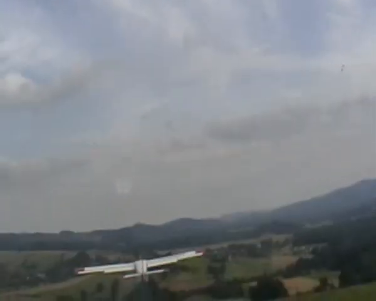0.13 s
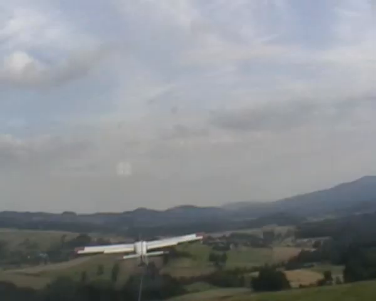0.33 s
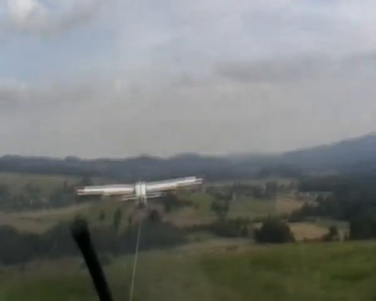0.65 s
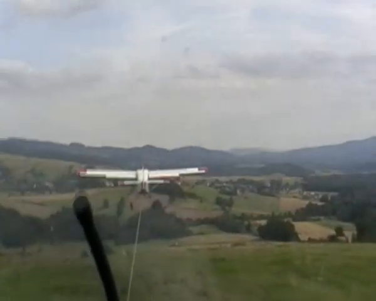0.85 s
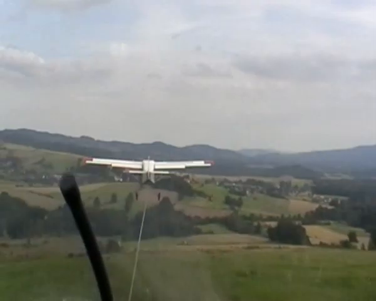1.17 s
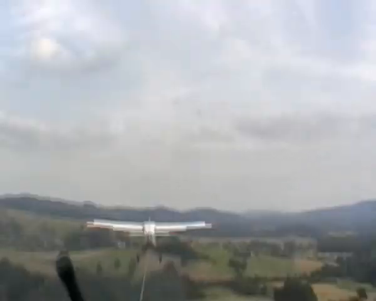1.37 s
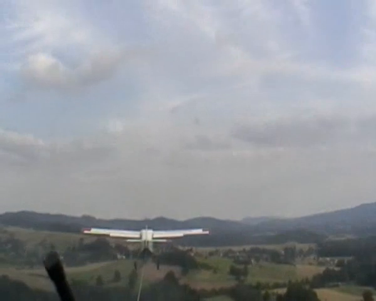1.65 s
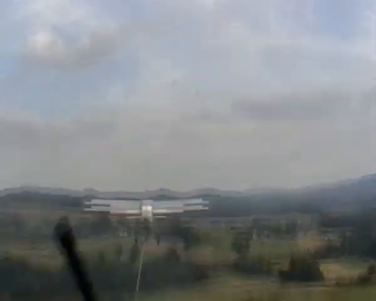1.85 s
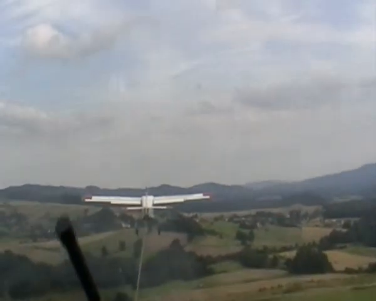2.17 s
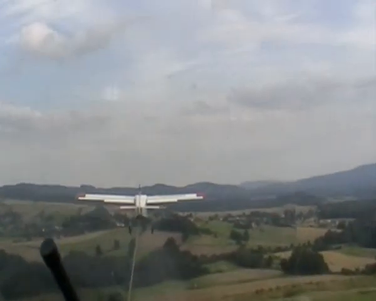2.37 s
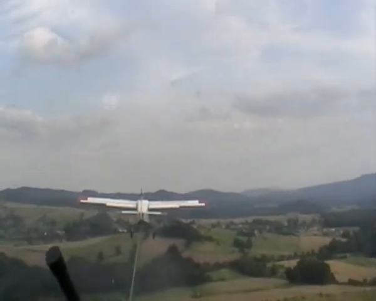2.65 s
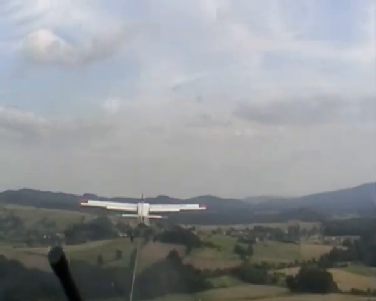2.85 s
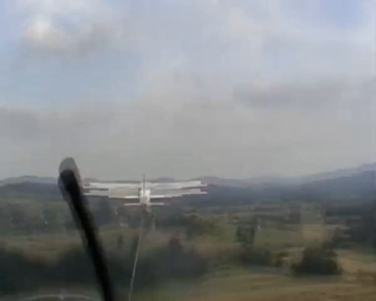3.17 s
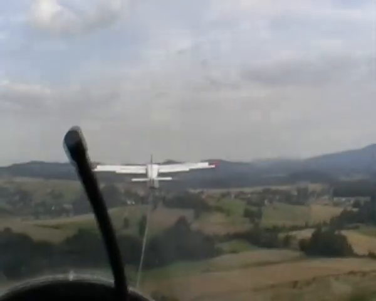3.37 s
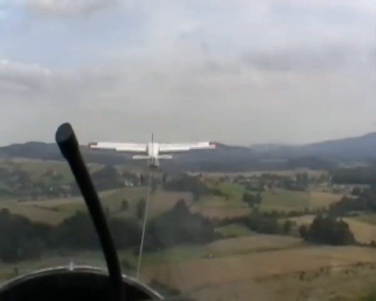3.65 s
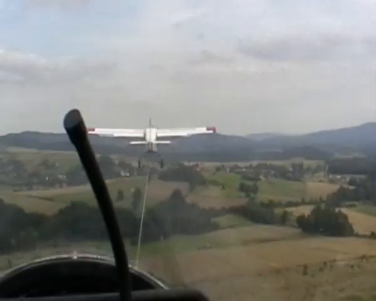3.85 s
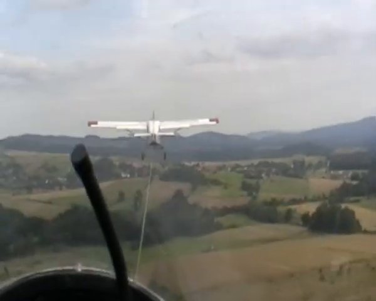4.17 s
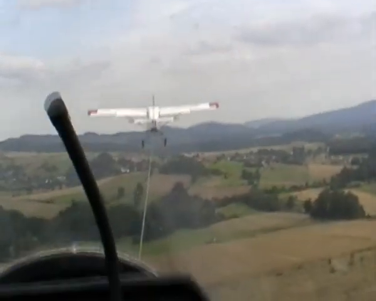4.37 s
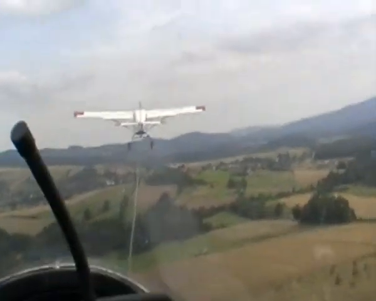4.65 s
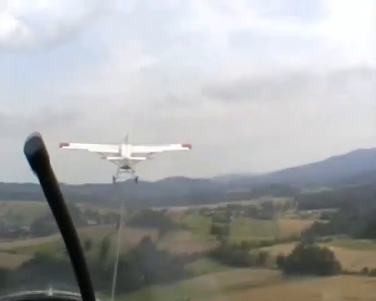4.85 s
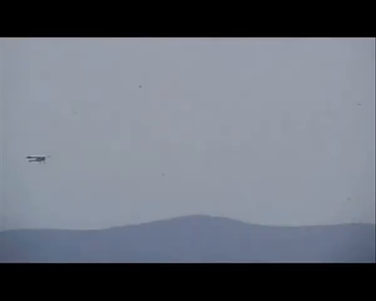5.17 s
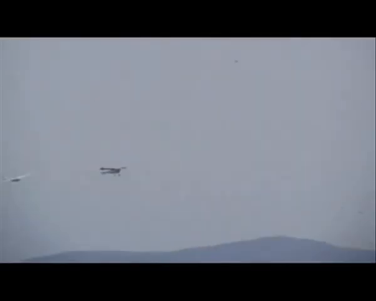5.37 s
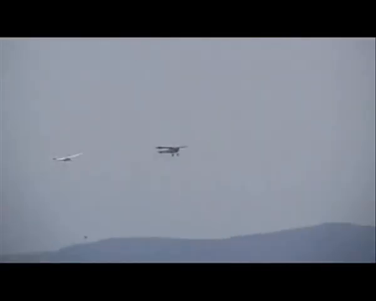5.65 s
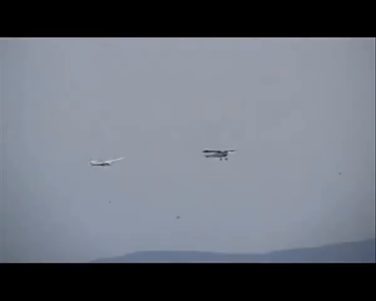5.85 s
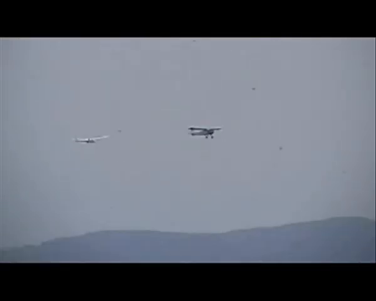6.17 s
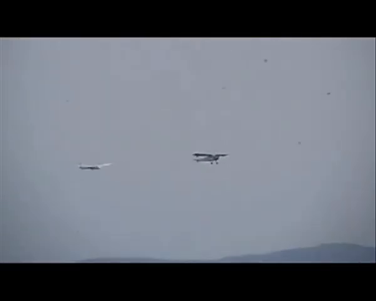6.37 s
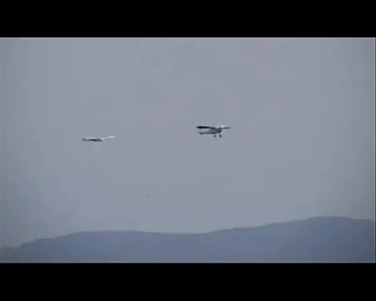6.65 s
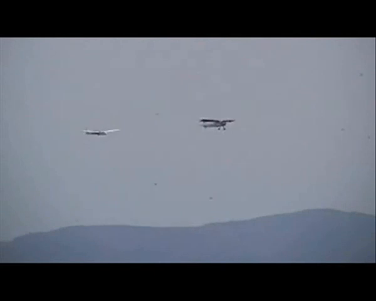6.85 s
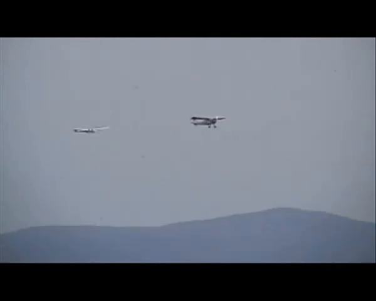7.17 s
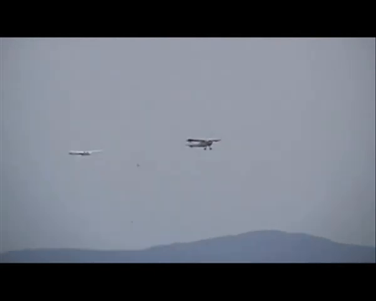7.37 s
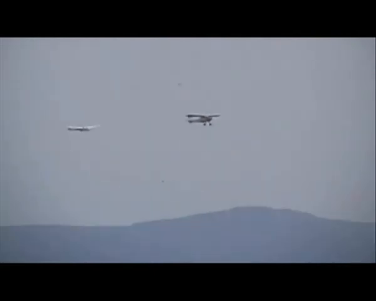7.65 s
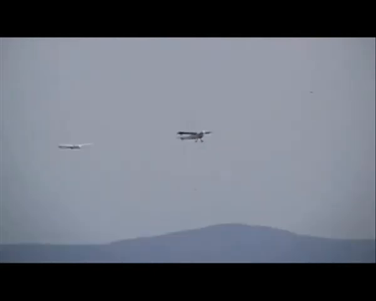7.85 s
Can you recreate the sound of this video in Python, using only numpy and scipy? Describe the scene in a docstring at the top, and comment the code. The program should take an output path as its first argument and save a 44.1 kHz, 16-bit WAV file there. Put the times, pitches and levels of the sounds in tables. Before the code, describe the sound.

Loud booming, rushing wind fills a glider cockpit, cuts off abruptly, then a distant propeller plane drones over a quiet meadow with buzzing crickets.

```python
"""Glider tow, cabin then meadow

In the cabin, turbulent air booms in the resonances and rushes and hisses through vents and seals.
The sound is cut; a thin hiss dies away, and after a short silence a meadow is heard. A far radial
engine is summed from orders of its firing cycle and noise with a ground echo. A bush cricket close by
and a fainter ticking one are gated noise, the bird pips gliding sines, over a soft field hiss.
A short soft click, a sine under a bell, comes at the very end."""
import sys
import numpy as np
from scipy import signal
from scipy.fft import rfft, irfft, next_fast_len
from scipy.io import wavfile

SR = 44100
rng = np.random.default_rng(int(sys.argv[2]) if len(sys.argv) > 2 else 0)


def to_wav(s):
    """Save 16-bit WAV."""
    ch = np.atleast_2d(s).T  # columns
    pcm = np.round(np.clip(ch, -1, 1) * 32767)  # PCM
    wavfile.write(sys.argv[1], SR, pcm.astype(np.int16))


N = 353663   # samples in both scenes together

CUT_S, MEADOW_S = 5.1045, 5.238   # cabin sound ends, meadow begins

# All levels are relative, ahead of the trims in the functions and the recorder.
# Air over the canopy. Each row: time in seconds, boom level in dB, rush level in dB.
AIRFLOW = [(0.0, -14.5, -25), (0.4, -13, -22), (0.5, -12.5, -24.5), (0.85, -13.5, -25), (1.3, -14.5, -24.5),
           (1.45, -14.5, -25), (2.0, -14, -25.5), (2.15, -15, -26.5), (2.55, -14, -26), (3.1, -14, -25),
           (3.27, -13.5, -24), (3.33, -14, -26), (3.7, -15, -26.5), (3.9, -16, -24), (4.2, -14, -23),
           (4.58, -13, -22.5), (4.65, -14.5, -21.5), (5.1, -13, -23)]
# Puffs through vent and seals. Each row: centre in seconds, lift in dB, length in seconds.
PUFFS = [(0.57, 4.5, 0.015), (0.912, -0.5, 0.021), (1.227, -1, 0.014), (1.61, 4.5, 0.023),
         (1.732, 4, 0.022), (2.105, 7.5, 0.011), (2.328, 4.5, 0.036), (2.625, 2.5, 0.043), (4.117, 3, .03),
         (5.024, 4.5, 0.021)]
RUSH_PUFFS, BOOM_PUFFS = 0.48, 0.55   # shares of a puff's lift; the hiss takes it all
HISS_DB, HISS_FOLLOWS = -41, 1.55   # leak hiss at the mean rush in dB; share of the rush's swing
# Boom colour in the cabin. Each row: frequency in Hz, spectrum in dB per Hz.
BOOM_SPECTRUM = [(12, -59), (25, -40), (40, -36), (52, -19.5), (90, -14.5), (130, -8), (200, -4.5),
                 (270, -3.5), (305, -8.5), (345, -17.5), (460, -15), (620, -16.5), (820, -23.5), (950, -29),
                 (1240, -56), (2000, -100)]
# Vent rush colour. Each row: frequency in Hz, spectrum in dB per Hz.
RUSH_SPECTRUM = [(500, -13.5), (850, -4), (873, -18), (935, -1), (1480, -2), (1660, -5), (2710, -1.5),
                 (3230, -5.5), (3960, -21), (4300, -19), (5590, -29.5), (9460, -120)]
# Seal leak colour. Each row: frequency in Hz, spectrum in dB per Hz.
HISS_SPECTRUM = [(2290, -33), (3900, -8), (4400, -4.5), (7320, 3), (8450, -3), (13000, -6.5), (15500, -8)]
# Cabin resonances. Each row: frequency in Hz, width in Hz, lift in dB.
CABIN_MODES = [(136.8, 20, 5.5), (176, 20, -1.5), (255.5, 16, 1.5), (290.3, 26.7, 7), (520.2, 47.3, 10.5),
               (573, 18, 4.5), (739, 59, 3.5), (800, 22, 3.5), (932, 34, 2.5), (2720, 460, 3.5)]
# Cabin microphone ports. Each row: frequency in Hz, left-right likeness from 0 to 1.
CABIN_LIKENESS = [(30, 0.64), (120, 0.96), (300, 1), (700, 0.94), (1300, 0.84), (2500, 1), (4300, 0.69),
                  (6000, 0.22), (7900, 0.19), (9000, 0.73), (15000, .7)]
# Cabin port levels. Each row: frequency in Hz, left minus right in dB.
CABIN_BALANCE = [(60, 1.5), (110, -2), (200, 0.0), (380, 1), (700, 2.0), (1290, 1), (2380, -0.5),
                 (4400, -0.5), (8120, 2.5), (15000, -0.5)]
# Cabin port phase. Each row: frequency in Hz, lead of the left in radians.
CABIN_PHASE = [(0, 0), (260, 0.4), (1890, -0.0), (3450, 0.3), (4050, 2.2), (4570, 2.5), (5250, 6.4),
               (6630, 6.4), (6980, 6.7), (7840, 9.0), (8270, 12.2), (8530, 12.5), (10300, 12.7),
               (15300, 12.6)]
# Thin hiss that outlasts the cut. Each row: frequency in Hz, spectrum in dB per Hz.
AFTER_HISS_SPECTRUM = [(35, -40), (100, -8), (1000, -13), (2800, -6), (4000, -18), (8000, -25),
                       (15600, -28)]
AFTER_HISS_DB, AFTER_HISS_T60_S = -42.5, 0.13   # level at the cut; time to fall 60 dB

# Far engine's pace. Each row: time in seconds, firing cycles per second.
FIRING_CYCLE = [(5.24, 17.8), (6.4, 17.85), (7.0, 17.88), (8.02, 18)]
# Far engine, carried unevenly by the air. Each row: time in seconds, then drone, growl and rasp in dB.
ENGINE_LEVELS = [(5.24, -43.5, -45, -57.5), (5.6, -42.2, -48, -58.5), (6.0, -42, -49, -58),
                 (6.45, -41, -51, -59), (6.85, -40.5, -49, -58), (7.15, -41.5, -47, -55.5),
                 (7.4, -42, -47, -55.5), (7.7, -39.5, -41.3, -49.5), (7.8, -39.3, -40.5, -48.5),
                 (8.02, -38.2, -43, -51.5)]
# Orders of the cylinders' firing. Each row: multiple of the cycle, level in dB.
FIRING_ORDERS = [(1, -44), (2, -40), (3, -22), (4, -29), (5, -29), (6, -14), (7, 0), (8, -22), (9, -5),
                 (10, -23), (11, -16), (12, -24), (13, -11), (14, -24), (15, -19), (16, -15), (17, -20),
                 (18, -24), (19, -18), (20, -19), (21, -22), (22, -25), (23, -15), (24, -21), (25, -24),
                 (26, -21), (27, -23), (28, -24), (29, -25), (30, -23), (31, -24), (32, -21), (33, -24),
                 (34, -25), (35, -22), (36, -25), (37, -28), (38, -27)]
# Exhaust noise. Each row: frequency in Hz, spectrum in dB per Hz.
GROWL_SPECTRUM = [(15, -60), (35, -24), (55, -10), (90, -1), (140, 10.5), (300, -10), (450, -18), (620, 2),
                  (780, -1), (950, -11), (1300, -60)]
# Propeller noise. Each row: frequency in Hz, spectrum in dB per Hz.
RASP_SPECTRUM = [(500, -46), (850, -6.5), (1180, 4.5), (1350, -3), (1600, -1), (2000, -13.5), (2280, -7),
                 (2550, -13), (2800, -8.5), (3300, -40), (4400, -40), (6000, -60)]
BRIGHTENS_HZ, BRIGHTENS = 1400, .45   # the rasp above this swings further, by this share of its swing
GROUND_ECHO_S, GROUND_ECHO_DB = .0018, -16.5   # delay and level of the engine noise off the ground

# Near cricket's beat: start in s, strokes per s, slows from s, by strokes per s each s.
WING_STROKES = 5.2017, 54.2, 7.3, 2.1
# Near cricket's buzz. Each row: time in seconds, level in dB, share in strokes from 0 to 1.
BUZZ = [(5.24, -68, .1), (5.6, -66, 0.04), (6.0, -60.5, 0.45), (6.4, -59, 0.64), (7.2, -54.5, 0.88),
        (8.02, -55, 0.9)]
# Wing resonances. Each row: frequency in Hz, spectrum in dB per Hz.
WING_SPECTRUM = [(5000, -45), (6500, -34), (7300, -14), (8100, -3), (8700, -3.5), (9400, -4), (9800, -0.5),
                 (10600, -0.5), (11000, -8), (11500, -5), (12300, -9), (12700, -16), (13300, -5),
                 (13750, -10), (13950, -80)]
# Faint cricket's beat: start in s, ticks per s, slows from s, by ticks per s each s.
TICKS = 5.231, 76.66, 6.2, 17
# Faint cricket. Each row: time in seconds, level in dB.
TICKING = [(5.24, -70), (6.3, -68), (6.5, -69), (6.63, -76)]
# Colour of the ticks. Each row: frequency in Hz, spectrum in dB per Hz.
TICK_SPECTRUM = [(11500, -50), (12800, -11), (13800, -3), (14500, 2), (15150, -5), (15300, -50)]
# Short tones: bird pips, and in the last row a soft click at the very end.
# Each row: centre in seconds, pitch in Hz, rise in Hz, length in seconds, level in dB.
SHORT_TONES = [(5.803, 3000, 250, .016, -56.5), (5.822, 3250, 150, .007, -65), (5.84, 3400, 50, .012, -63),
               (5.857, 3320, -100, .016, -58), (5.874, 3380, 0, .008, -67), (6.625, 2760, 0, .022, -61.5),
               (8.016, 2800, 0, .012, -53)]
BIRD_PIPS, END_CLICK = SHORT_TONES[:-1], SHORT_TONES[-1:]

# Hiss of the field. Each row: frequency in Hz, spectrum in dB per Hz.
FIELD_HISS_SPECTRUM = [(800, -30), (1500, -6.5), (2800, -2.5), (3900, -11), (4400, -11), (4800, -11),
                       (7000, -11.5), (9000, -17), (13500, -40), (14000, -80)]
FIELD_HISS_DB = -66
# Faint steady tones. Each row: frequency in Hz, level in dB.
WHINE = [(2788, -76), (3900, -90)]
# Meadow microphone ports. Each row: frequency in Hz, left-right likeness from 0 to 1.
MEADOW_LIKENESS = [(30, .9), (120, 0.91), (300, 0.92), (700, 0.82), (1300, 0.86), (2500, 0.98), (4300, .4),
                   (6000, 0.4), (7900, 0.27), (9000, 1), (15000, 0.63)]
# Meadow port levels. Each row: frequency in Hz, left minus right in dB.
MEADOW_BALANCE = [(60, -13), (110, 1.5), (200, -0.5), (380, 2.5), (700, 0.5), (1290, 1.5), (2380, -0.5),
                  (4400, 0.5), (8120, -1), (15000, 2)]
# Meadow port phase. Each row: frequency in Hz, lead of the left in radians.
MEADOW_PHASE = [(0, 0), (3190, -0.1), (3880, 0.7), (4310, 3.2), (5080, 3.2), (6630, 4.6), (7750, 2.7),
                (8440, 0.1), (10700, -0.5), (11200, 0.1), (11500, -0.1), (13800, 0.0), (14300, 0.7),
                (15300, -0.1)]
CUTOFF_HZ = 15730   # top of the recorder


def cockpit():
    """Boom, rush and hiss share the buffeting of the tow plane's wake and ring in the cabin."""
    size = next_fast_len(int(MEADOW_S * SR))
    time = np.arange(size) / SR
    boom_db, rush_db, hiss_db = airflow(time)
    buffet = drift(18, size)
    air = from_db(boom_db) * patchy_noise(BOOM_SPECTRUM, size, 1.26 * buffet, own_db=0.25, own_rate=17)
    air += from_db(rush_db) * patchy_noise(RUSH_SPECTRUM, size, 1.13 * buffet,
                                           own_db=0.38, own_rate=28, count=4)
    air += from_db(hiss_db) * patchy_noise(HISS_SPECTRUM, size, 0.86 * buffet,
                                           own_db=0.65, own_rate=24, count=3)
    air = cabin_resonance(air)
    air = two_ports(air[0], CABIN_LIKENESS, CABIN_BALANCE, CABIN_PHASE, air[1])
    air *= np.clip((CUT_S - time) / 0.00046, 0, 1)   # a hard cut, ramped just enough
    return air + after_hiss(time)


def airflow(time):
    """Levels of boom, rush and hiss: the slow flow, with short puffs on top."""
    boom_db, rush_db = in_time(AIRFLOW, time)
    puff_db = sum(db * np.exp(-((time - s) / length) ** 2) for s, db, length in PUFFS)
    hiss_db = HISS_DB + HISS_FOLLOWS * (rush_db - rush_db.mean())
    return boom_db + BOOM_PUFFS * puff_db, rush_db + RUSH_PUFFS * puff_db, hiss_db + puff_db


def cabin_resonance(air):
    """The enclosed air lifts a bell of frequencies around each of its modes."""
    size = air.shape[1]
    hz = np.arange(size // 2 + 1) * SR / size
    lift_db = sum(db / (1 + (2 * (hz - mode_hz) / width) ** 2) for mode_hz, width, db in CABIN_MODES)
    return irfft(rfft(air) * from_db(lift_db - 3), size)


def after_hiss(time):
    """Thin hiss, alike in both channels, that decays exponentially after the cut and then stops."""
    since = time - CUT_S
    level = from_db(AFTER_HISS_DB - 60 * np.maximum(since, 0) / AFTER_HISS_T60_S)
    level *= (since > 0) * (since < .062)
    return level * patchy_noise(AFTER_HISS_SPECTRUM, len(time), 0, own_db=-3.5, own_rate=12, count=1)[0]


def far_engine(time):
    """Tonal drone, exhaust growl and propeller rasp at a distance; the noise also returns off the ground."""
    cycle_hz, = in_time(FIRING_CYCLE, time)
    drone_db, growl_db, rasp_db = in_time(ENGINE_LEVELS, time)
    turns = 2 * np.pi * (np.cumsum(cycle_hz) / SR + .45)   # phase of the cycle in radians
    drone = engine_drone(turns, drone_db, growl_db)
    noise = exhaust_growl(turns, growl_db) + propeller_rasp(turns, rasp_db)
    noise += from_db(GROUND_ECHO_DB) * np.roll(noise, int(GROUND_ECHO_S * SR), axis=1)
    return drone + noise


def engine_drone(turns, drone_db, growl_db):
    """Each order of the firing cycle is a sine whose level and phase waver in the air."""
    size = len(turns)
    drone = np.zeros((2, size))
    for order, level_db in FIRING_ORDERS:
        high = np.clip((order - 9) / 8, 0, 1)   # high orders follow the growl and waver more
        carried_db = drone_db + high * (growl_db + 8.5 - drone_db)
        carried_db = carried_db + (.7 + 2.8 * high) * drift(2.2, size)
        wander = .008 * order * drift(3, size)
        wander = wander + rng.normal(0, 1.5, (2, 1))   # phases loosely bunched into a thud
        drone += from_db(level_db + carried_db - 1.5) * np.sin(order * turns + wander)
    return drone


def exhaust_growl(turns, growl_db):
    """Exhaust noise that swells once a firing cycle."""
    thud = from_db(growl_db - 6.5) * (1 + .3 * np.sin(turns))
    return thud * patchy_noise(GROWL_SPECTRUM, len(turns), 0, own_db=2.5, own_rate=5.4, count=8)


def propeller_rasp(turns, rasp_db):
    """Propeller noise in three uneven beats a cycle, brighter when it is carried louder."""
    size = len(turns)
    beats = 1 + .3 * np.cos(3 * turns + 1.2 * drift(6, size))
    rasp = patchy_noise(RASP_SPECTRUM, size, 1.1 * drift(40, size), own_db=2.8, own_rate=3.8, count=7)
    top = signal.sosfiltfilt(signal.butter(2, BRIGHTENS_HZ, "high", fs=SR, output="sos"), rasp)
    rasp = rasp + top * (from_db(BRIGHTENS * (rasp_db - rasp_db.mean())) - 1)
    return from_db(rasp_db - 3.0) * beats * rasp


def bush_cricket(time):
    """Close by: noise in the wing resonances for dense tooth clicks, part steady, part gated by strokes."""
    level_db, share = in_time(BUZZ, time)
    share = np.clip(share, 0, 1)
    strokes = stroke(strokes_so_far(time, *WING_STROKES), rise=0.23, fall=0.16)
    gate = np.sqrt(1 - share) + np.sqrt(share) * strokes
    buzz = patchy_noise(WING_SPECTRUM, len(time), 0, own_db=-0.6, own_rate=8, count=4)
    return from_db(level_db - 2.5) * gate * buzz


def ticking_cricket(time):
    """Fainter: a high band of noise gated by quick wing strokes, faded out at the last row."""
    tick_db, = in_time(TICKING, time)
    gate = .6 + .8 * stroke(strokes_so_far(time, *TICKS), rise=.08, fall=0.11)
    ticks = patchy_noise(TICK_SPECTRUM, len(time), 0, own_db=0, own_rate=8, count=1)
    ticks *= np.clip((TICKING[-1][0] - time) / .05, 0, 1)
    return from_db(tick_db - 4.0) * gate * ticks


def stroke(count, rise, fall):
    """Gate for one wing stroke a cycle: exponential swell and fall (in cycles); rms 1."""
    phase = (count + .45) % 1 - .5
    return rms_one(np.exp(-abs(phase) / np.where(phase < 0, rise, fall)))


def strokes_so_far(time, start, rate, slows_from, slowing):
    """Count of a steady beat that slows evenly towards its end."""
    return rate * (time - start) - slowing * np.maximum(time - slows_from, 0) ** 2 / 2


def bird(time):
    """Short pips, hoarse and broken by the air."""
    return short_tones(BIRD_PIPS, time)


def end_click(time):
    """A short soft click at the very end: a sine of steady pitch under a bell."""
    return short_tones(END_CLICK, time)


def short_tones(rows, time):
    """Gliding sines, each under a soft bell, with a quickly flickering level."""
    tones = np.zeros(len(time))
    for s, pitch_hz, rise_hz, length, level_db in rows:
        since = time - s
        turns = pitch_hz * since + rise_hz * since ** 2 / (2 * length)
        bell = np.exp(-(2 * since / length) ** 2)
        tones += from_db(level_db) * bell * np.sin(2 * np.pi * turns)
    return tones * from_db(4 * drift(150, len(time)) + .3)


def stillness(time):
    """Background: soft coloured noise of the field and faint steady sines."""
    hiss = patchy_noise(FIELD_HISS_SPECTRUM, len(time), 0, own_db=1.0, own_rate=8, count=4)
    whine = sum(from_db(db) * np.sin(2 * np.pi * hz * time) for hz, db in WHINE)
    return from_db(FIELD_HISS_DB) * hiss + whine


def meadow():
    """Everything after the silence, summed at the two microphone ports."""
    time = MEADOW_S + np.arange(next_fast_len(N - int(MEADOW_S * SR))) / SR
    sound = far_engine(time) + bush_cricket(time) + ticking_cricket(time)
    sound = sound + bird(time) + end_click(time) + stillness(time)
    return two_ports(sound[0], MEADOW_LIKENESS, MEADOW_BALANCE, MEADOW_PHASE, sound[1])


def two_ports(x, likeness, balance, phase, other):
    """Two close microphone ports: a shared part and an unlike part, with a phase and level offset."""
    hz = np.arange(len(x) // 2 + 1) * SR / len(x)
    alike = np.clip(at_hz(likeness, hz), 0, 1)
    phase_hz, radians = np.array(phase, float).T
    # each port takes half of the offset
    lead = from_db(at_hz(balance, hz) / 2) * np.exp(.5j * np.interp(hz, phase_hz, radians))
    mid = np.sqrt((1 + alike) / 2) * rfft(x)
    side = np.sqrt((1 - alike) / 2) * rfft(other)
    return irfft([(mid + side) * lead, (mid - side) / lead], len(x))


def patchy_noise(spectrum, size, shared, own_db, own_rate, count=6):
    """Two draws of coloured noise in overlapping bands, each band flickering on its own; rms 1."""
    hz = np.arange(size // 2 + 1) * SR / size
    coloured = rfft(rng.standard_normal((2, size))) * from_db(at_hz(spectrum, hz))
    ends_hz = [spectrum[1][0], spectrum[-3][0]]   # centres of the lowest and highest band
    place = np.interp(np.log(hz + 1), np.log(ends_hz), [0, count - 1])
    noise = 0
    for k in range(count):
        band = irfft(coloured * np.clip(1 - abs(place - k), 0, 1), size)
        noise = noise + band * from_db(shared + own_db * drift(own_rate, size))
    return rms_one(noise)


def drift(rate, size):
    """Slow chance: noise at every 40th sample through a double one-pole low-pass (rate in Hz); rms 1."""
    r = np.exp(-80 * np.pi * rate / SR)
    slow = signal.lfilter([1], [1, -2 * r, r * r], rng.standard_normal(size // 40 + 2002))
    slow = slow[2000:]   # drop the filter's settling
    return np.interp(np.arange(size) / 40, np.arange(len(slow)), rms_one(slow))


def in_time(rows, time):
    """Columns of a table read at the given times."""
    s, *columns = np.transpose(rows)
    return [np.interp(time, s, column) for column in columns]


def at_hz(points, hz):
    """A spectrum table read on a log frequency axis."""
    table = np.array(points, float)
    return np.interp(np.log(hz + 1), np.log(table[:, 0] + 1), table[:, 1])


def from_db(db):
    """Decibels to gain."""
    return 10 ** (np.asarray(db) / 20)


def rms_one(x):
    """Scale to rms 1."""
    return x / np.sqrt(np.mean(x ** 2) + 1e-20)


def scene():
    """Cockpit first, then the meadow."""
    join = int(MEADOW_S * SR)
    return np.hstack([cockpit()[:, :join], meadow()[:, :N - join]])


def record(dry):
    """The recorder rounds the peaks and cuts the top with a steep low-pass."""
    rounded = 1.3 * np.tanh(dry / .98)
    return signal.sosfilt(signal.ellip(12, .5, 70, CUTOFF_HZ, fs=SR, output="sos"), rounded)


dry = scene()
out = record(dry)
to_wav(out)
```